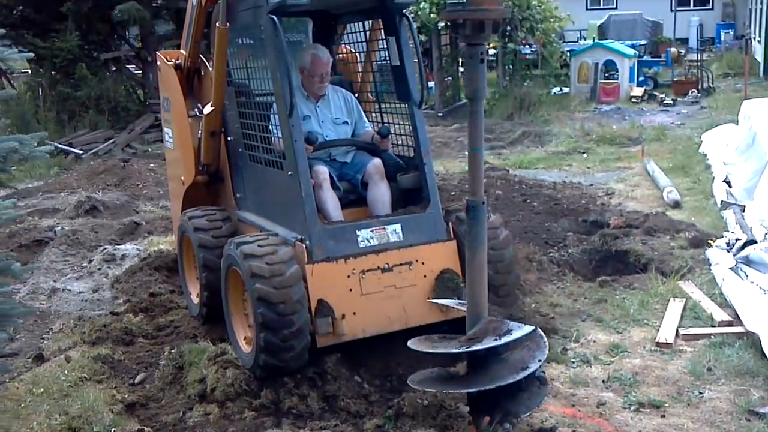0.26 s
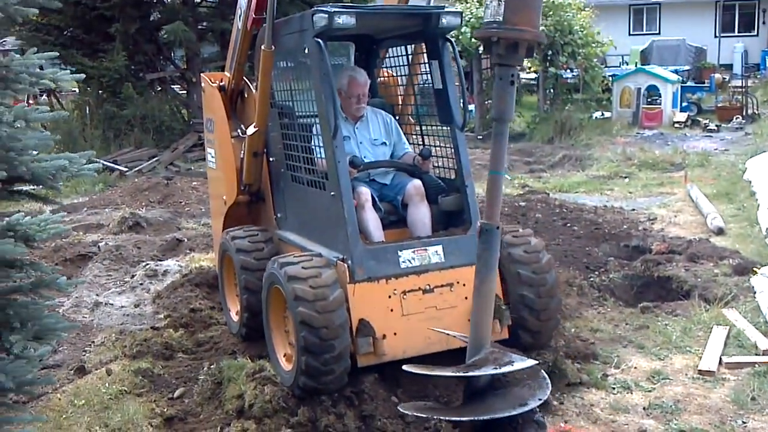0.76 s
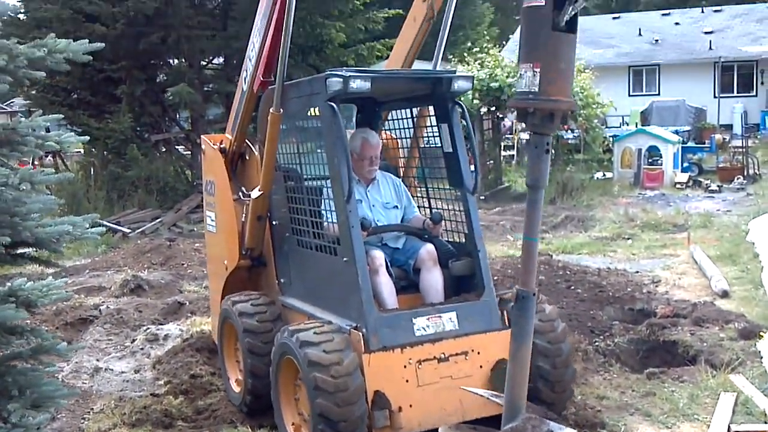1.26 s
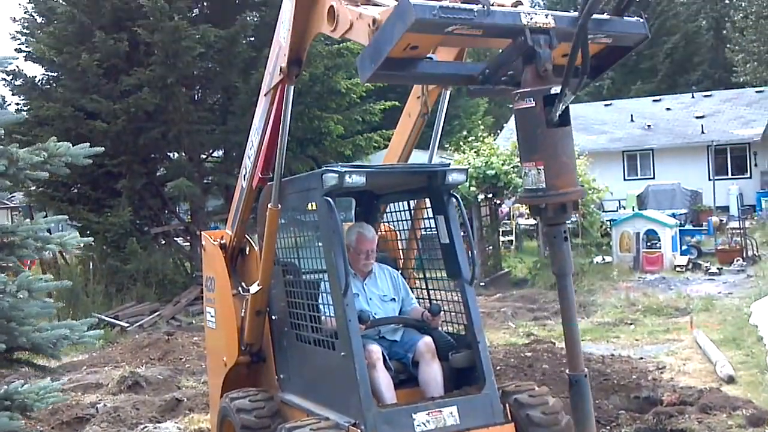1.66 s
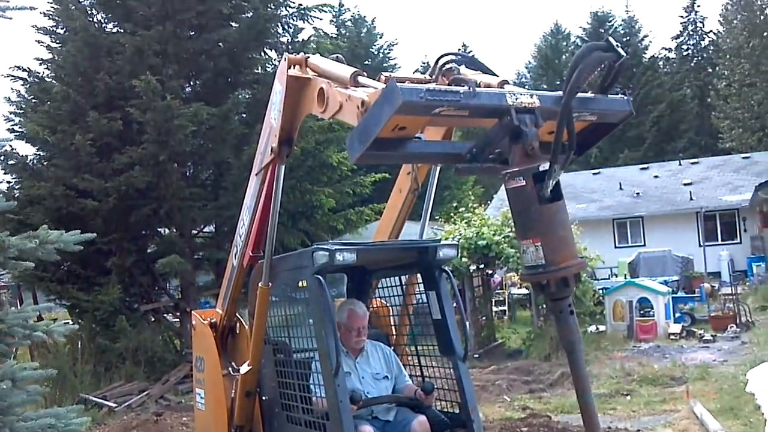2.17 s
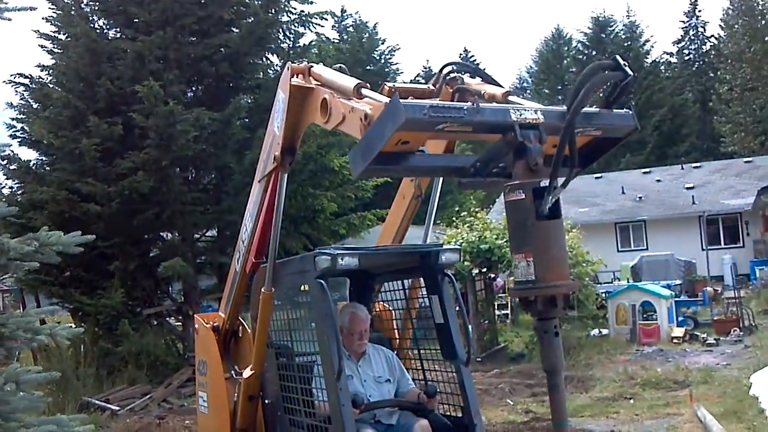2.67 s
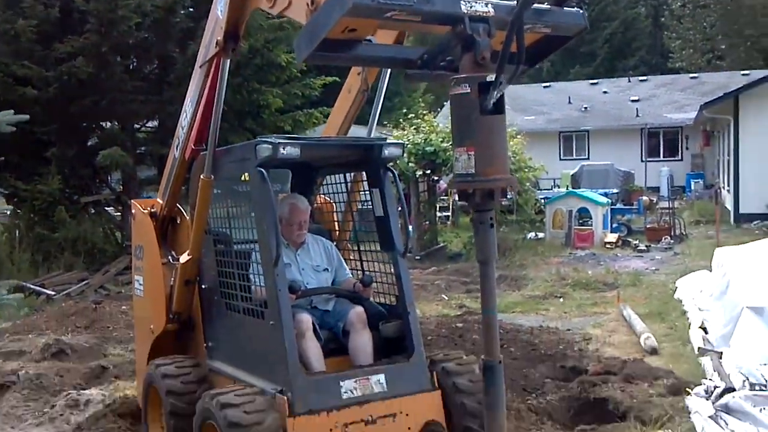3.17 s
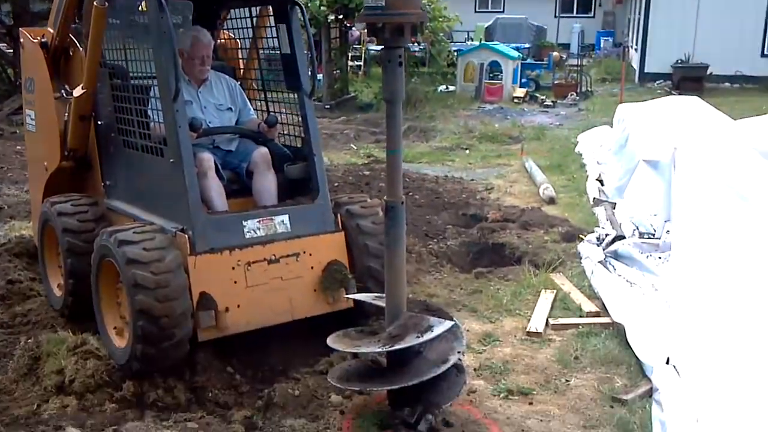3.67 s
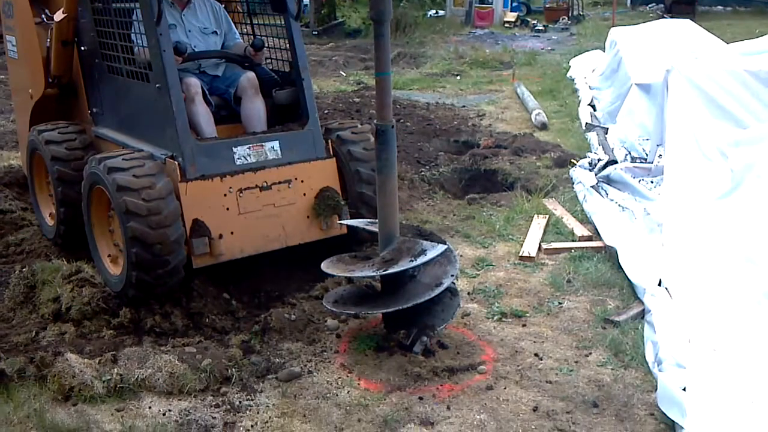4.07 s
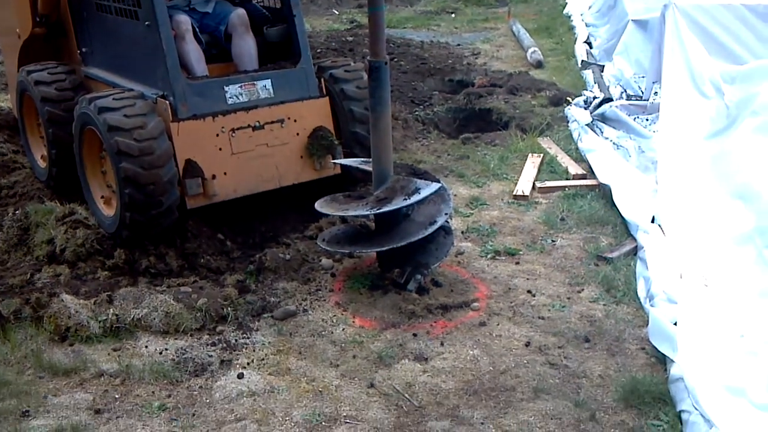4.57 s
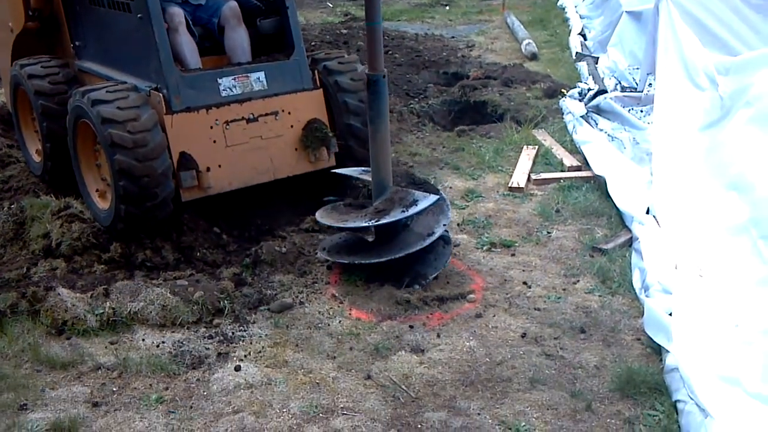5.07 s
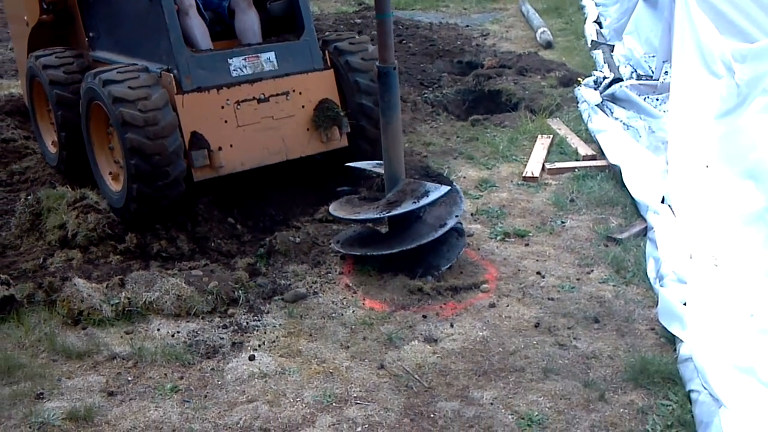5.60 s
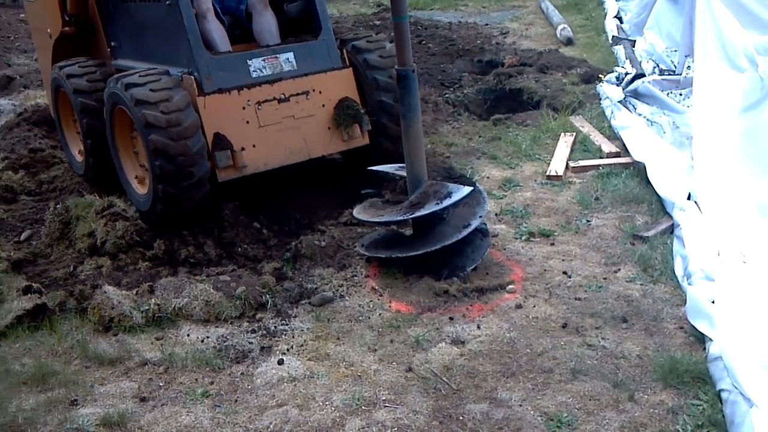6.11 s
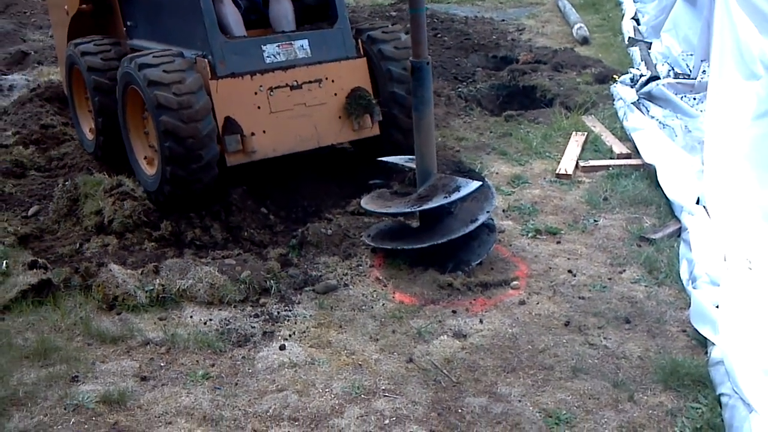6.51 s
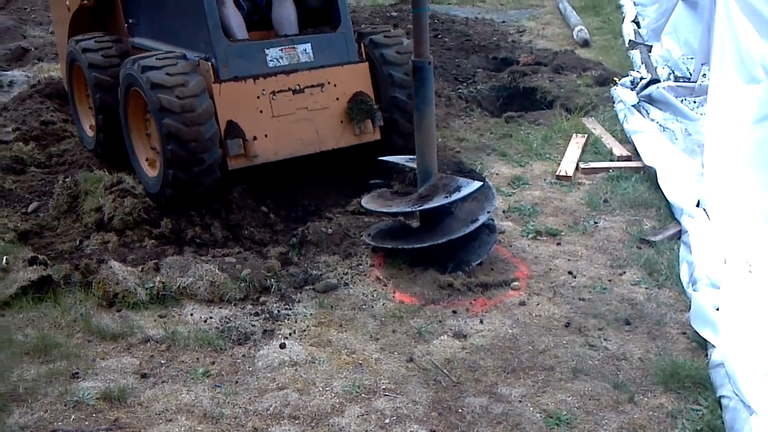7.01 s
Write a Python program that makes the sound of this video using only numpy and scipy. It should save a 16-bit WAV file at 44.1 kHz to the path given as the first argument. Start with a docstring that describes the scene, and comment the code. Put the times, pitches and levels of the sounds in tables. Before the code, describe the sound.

Steady diesel rattle with hydraulic whine and hiss, dry metallic groans, a bright steel-on-stone crack with scraping, then late buffeting wind on the microphone.

```python
"""A skid-steer loader in a backyard lifts its boom: the diesel clatters at a governed speed, the gear
pump whines, oil hisses and the dry boom pivots groan and clank. Then a post-hole auger is set
on stony soil; its bit cracks on a stone, scrapes and rings. Late gusts of filtered noise buffet the
two close ports of a hand-held phone. Its gain control creeps up, ducks at the crack and at the hardest
gust, and creeps up again. Tones are sines on a shared shaft; contacts are short noise bursts and modes."""
import sys
import numpy as np
from scipy import signal
from scipy.fft import rfft, irfft
from scipy.io import wavfile

SR = 44100
rng = np.random.default_rng(int(sys.argv[2]) if len(sys.argv) > 2 else 0)


def to_wav(s):
    """Save 16-bit WAV."""
    ch = np.atleast_2d(s).T  # columns
    pcm = np.round(np.clip(ch, -1, 1) * 32767)  # PCM
    wavfile.write(sys.argv[1], SR, pcm.astype(np.int16))


N = 319725  # samples, 7.25 s
T = np.arange(N) / SR  # time in s
FREQ = np.maximum(np.fft.rfftfreq(N, 1 / SR), 1)  # Hz
AGE = np.arange(SR // 2) / SR  # seconds since a short sound began
PUMP_TEETH = 10  # on the gear that the engine shaft turns


def undb(db):
    """Decibels to gain."""
    return 10 ** (np.asarray(db) / 20)


def unit(x):
    """Scale to rms 1."""
    return x / np.sqrt(np.mean(x ** 2))


def curve(table):
    """Straight lines between the (time_s, value) rows of a table, one value a sample."""
    time_s, value = np.transpose(table)
    return np.interp(T, time_s, value)


def colour(x, points):
    """Filter by a spectrum of (pitch_hz, level_db) points."""
    hz, db = np.transpose(points)
    return irfft(rfft(x) * undb(np.interp(np.log(FREQ), np.log(hz), db)), N)


def resonate(x, hz, width_hz):
    """A steep resonance, output rms 1."""
    count = x.shape[-1]
    f = np.maximum(np.fft.rfftfreq(count, 1 / SR), 1)
    detuning = (f - hz ** 2 / f) / width_hz
    return unit(irfft(rfft(x) / (1 + detuning ** 2), count))


def noise():
    """Two unrelated white noises."""
    return rng.standard_normal((2, N))


def grit():
    """A half-second stretch of two unrelated white noises."""
    return rng.standard_normal((2, len(AGE)))


def walk(count):
    """Smooth random wander of spread 1, with count new values a second."""
    values = rng.standard_normal(count * N // SR + 2)
    knots = signal.resample_poly(values, 8, 1)
    return np.interp(T, np.linspace(0, T[-1], len(knots)), unit(knots))


def place(pair, lean=0):
    """Direct and scattered sound to mid and side; lean is towards the left."""
    # how diffuse the machine's sound is: (pitch_hz, side_minus_mid_db)
    spread = [(60, -2), (150, -21), (420, -4.5), (560, 2), (750, -20), (1300, 2), (2400, 1), (15000, -0.5)]
    return np.array([pair[0], lean * pair[0] + colour(pair[1], spread)])


def tone(turns, lean, flutter_db, jitter):
    """One sine as mid and side, wavering in level and, by jitter in radians, in phase."""
    phase = 2 * np.pi * (turns + rng.random()) + jitter * walk(count=24)
    level = undb(flutter_db * walk(count=18))
    return np.sqrt(2) * np.sin(phase) * level * np.array([[1], [lean]])


def throb(turns, firing, shaft):
    """Loudness swells at each firing (two a turn) and once a turn."""
    return unit(np.exp(firing * np.cos(4 * np.pi * turns) + shaft * np.cos(2 * np.pi * turns)))


def puffs(cycles, rise, decay, scatter_db):
    """One sharp-fronted swell a cycle, each of its own strength; rise and decay are shares of the cycle."""
    phase, index = cycles % 1, cycles.astype(int)
    strength = undb(scatter_db * rng.standard_normal(N // 100))
    front = 1 - np.exp(-phase / rise)
    return unit(strength[index] * front * np.exp(-phase / decay))


def burst(rise, t60):
    """Envelope of a short sound: quick rise, then an exponential fall by 60 dB in t60 seconds."""
    return (1 - np.exp(-AGE / rise)) * np.exp(-np.log(1000) * AGE / t60)


def ringing(modes):
    """Struck steel: dying sine modes, as direct and scattered sound."""
    out = np.zeros((2, len(AGE)))
    for hz, db, t60 in modes:
        sine = np.sin(2 * np.pi * (hz * AGE + rng.random((2, 1))))
        out += undb(db) * burst(0.00035, t60) * sine
    return out


def add(track, s, sound):
    """Mix a short sound into a track at time s."""
    start = max(int(s * SR), 0)
    track[..., start:start + len(AGE)] += sound[..., :N - start]


def wind(mid_db=-14, side_db=2.5, overload_db=-13):
    """Eddies push on each port separately, so they sound mostly at the sides; the hardest overload the ports."""
    # strength of the breeze on the ports: (time_s, level_db)
    breeze = [(0, -53), (5.6, -48), (5.85, -38), (6.02, -42.5), (6.2, -27), (6.7, -31.5), (6.9, -19.5),
              (7.25, -38)]
    # the hardest gusts: (start_s, level_db)
    gusts = [(6.362, -16), (6.501, -10), (6.94, -5), (6.968, -8), (7.112, -12)]
    # colour of the wind noise: (pitch_hz, level_db)
    wind_colour = [(30, -32), (70, -41), (110, 9.5), (170, 4.5), (300, -3), (600, -19), (1500, -48),
                   (5000, -80)]
    push = undb(curve(breeze) + 0 * walk(count=20))  # the breeze follows its curve without extra flutter
    for s, db in gusts:
        add(push, s, undb(db) * burst(rise=0.002, t60=0.14))
    pressure = push * unit(colour(noise(), wind_colour))
    limit = undb(overload_db)
    return limit * np.tanh(pressure / limit) * undb([[mid_db], [side_db]])


def thud(start_s=6.965, level_db=-4.5, hz=257):
    """A couple of low cycles as the air slaps the phone at the peak of the hardest gust."""
    out = np.zeros((2, N))
    slap = burst(rise=0.0014, t60=0.027) * np.sin(2 * np.pi * hz * AGE)
    add(out, start_s, undb(level_db) * slap * np.array([[1], [.5]]))
    return out


def ticks(t60=0.0051):
    """Small stones tick dryly: a few dying cycles with a trace of grit."""
    # dry ticks: (start_s, level_db, pitch_hz)
    tick_table = [(0.248, 0.7, 3570), (1.343, 1.5, 3370)]
    out = np.zeros((2, N))
    for s, db, hz in tick_table:
        ping = np.sin(2 * np.pi * hz * AGE) * np.array([[1], [.3]])
        add(out, s, undb(db) * burst(0.00034, t60) * (ping + 0.21 * resonate(grit(), 4500, 9000)))
    return out


def oil(turns, hiss_db=-31):
    """Turbulent oil hisses in time with the engine and sings in the lift valve."""
    # colour of the hiss: (pitch_hz, level_db)
    oil_colour = [(90, -38), (550, -7), (800, -2), (1800, -4), (2250, -3), (3000, 2), (3700, 1.5),
                  (4400, -1), (5100, 0), (5700, -2), (6500, -4), (7800, -4.5), (9500, -9), (11200, -7.5),
                  (13500, -20), (16000, -12)]
    # oil rushing through the lift valve: (time_s, level_db)
    valve_level = [(0, -54), (1.7, -40), (3.05, -31.5), (3.8, -40.5), (5.2, -67), (7.25, -38)]
    # a thin, very high sizzle: (time_s, level_db)
    sizzle_level = [(0, -47), (3, -48), (5.25, -41), (5.5, -34.5), (6.0, -36), (6.08, -47), (7.25, -39)]
    rush = noise() * throb(turns, firing=0.049, shaft=0.016)
    hiss = unit(colour(rush, oil_colour)) * undb(0.73 * walk(count=24))
    sizzle = resonate(noise(), 11900, 9400)
    valve = resonate(noise(), 1506, 280.0) * throb(turns, firing=0.064, shaft=0.037)
    spray = place(undb(hiss_db) * hiss + undb(curve(sizzle_level)) * sizzle)
    return spray + undb(curve(valve_level)) * place(valve, lean=0.5)


def pump(turns):
    """Gear teeth pulse the oil: a whine, its octave and upper partials, and a drone from the lift circuit."""
    # level of the whine: (time_s, level_db)
    whine_level = [(0, -26), (.8, -23), (1.05, -26.5), (1.9, -22.5), (2.1, -26.5), (2.7, -25.5),
                   (2.9, -30.5), (3.3, -24.5), (4.7, -22.5), (5.2, -26.5), (5.5, -32.5), (6.03, -24),
                   (6.1, -34), (6.18, -25), (6.45, -29.5), (7.11, -25), (7.17, -39)]
    # the octave grows as the auger is lowered and loaded: (time_s, level_db)
    octave_level = [(0, -44), (3.2, -38), (3.45, -33), (5.0, -29.5), (5.25, -52), (5.6, -29.5), (6.2, -35),
                    (7.0, -33), (7.25, -40)]
    # pressure on the bit once it bores, which lifts the upper partials: (time_s, level_db)
    boring = [(0, -30), (5.3, -34), (5.6, 1.5), (6.0, 4.5), (6.2, -10), (7.25, 4)]
    # upper partials under load: (multiple of the tooth rate, level_db against the octave)
    upper_partials = [(3, -13), (4, -10.5)]
    # drone of the lift circuit while the boom rises: (time_s, level_db)
    lift_level = [(0, -34), (1.25, -38.5), (1.45, -33), (1.64, -25), (1.85, -31.5), (2.05, -33),
                  (2.28, -28), (2.5, -35.5), (3.2, -65), (7.25, -56)]
    # partials of the drone: (multiple of the shaft speed, level_db)
    lift_orders = [(14, -1), (21, -3.5), (26, -15), (28, -13), (30, -16), (42, -11.5), (44, -13.5)]
    teeth = PUMP_TEETH * turns
    octave_db = curve(octave_level)
    whine = undb(curve(whine_level)) * tone(teeth, lean=0.26, flutter_db=0.87, jitter=0.06)
    octave = undb(octave_db) * tone(2 * teeth, lean=0.3, flutter_db=0.5, jitter=0.054)
    drone = sum(undb(db) * tone(order * turns, lean=.2, flutter_db=.7, jitter=.1)
                for order, db in lift_orders)
    strain = sum(undb(db) * tone(k * teeth, lean=.1, flutter_db=-4.5, jitter=0.25)
                 for k, db in upper_partials)
    strain_db = octave_db + curve(boring)
    return whine + octave + undb(strain_db) * strain + undb(curve(lift_level)) * drone


def diesel(turns, repeat_db=-8.0, clatter_db=1.5, tones_db=-3.0, bark_db=-8.5, knock_db=-9):
    """Valve gear and injectors rattle alike in every turn, combustion differs each time."""
    # colour of the engine block: (pitch_hz, level_db)
    block = [(30, -48), (95, -25), (145, -1.5), (175, -1.5), (250, 2), (420, 3.5), (500, 0.5), (545, -7),
             (700, 2), (850, 1), (1020, -2), (1170, -6), (1500, -7), (1950, -2.5), (2600, -12), (5000, -44)]
    # engine tones: (multiple of the shaft speed, level_db against each other)
    shaft_orders = [(2, -22), (4, -12), (4.5, -12), (6, -10.5), (7.6, -10.5), (11, -14.5), (13, -16),
                    (14, -16), (15.3, -8.5), (19, -11), (21, -7), (24, -7.5), (26, -15), (29, -13.5),
                    (30, -6), (31, -8), (32, -6.5), (34, -14.5), (37, -18.5), (40, -17), (46, -13.5),
                    (50, -11.5), (58, -12.5)]
    # strength of combustion: (time_s, level_db)
    effort = [(0, 0), (1.5, -.5), (3.1, 0), (3.6, 1), (5.2, 1.5), (5.5, -0.5), (6.3, -3), (7.25, 1.5)]
    size = 1374  # points in the noise pattern of one turn
    pattern = irfft(np.exp(2j * np.pi * rng.random((2, size // 2 + 1))))
    grid = np.arange(size) / size
    repeating = unit(np.array([np.interp(turns % 1, grid, p) for p in pattern]))
    blows = (noise() + undb(repeat_db) * repeating) * throb(turns, firing=0.017, shaft=0.016)
    clatter = place(unit(colour(blows, block)), lean=0.5)
    # higher tones waver more
    tones = sum(undb(db) * tone(order * turns, lean=0.12, flutter_db=min(0.1 * order, 1), jitter=0.004 * order)
                for order, db in shaft_orders)
    # the exhaust barks once a turn and the tones chug with it, 0.3 turns late; every firing knocks
    chug = throb(turns - .3, firing=0, shaft=.35)
    bark = place(resonate(noise(), 770, 310), lean=0.05)
    bark = bark * puffs(turns, rise=0.095, decay=0.6, scatter_db=.5)
    knock = place(resonate(noise() + repeating, 1450, 1240), lean=0.32)
    knock = knock * puffs(2 * turns, rise=.03, decay=0.62, scatter_db=2.5)
    combustion = undb(tones_db) * tones * chug + undb(bark_db) * bark + undb(knock_db) * knock
    uneven = undb(0.92 * walk(count=24))  # no two working cycles burn alike
    return uneven * (undb(clatter_db) * clatter + undb(curve(effort)) * combustion)


def boom():
    """Dry pivots stick and slip in nearly pure groans that chatter, arch in pitch, waver and sag."""
    # groans and squeaks of the pivots: (middle_s, length_s, pitch_hz, level_db)
    groans = [(0.863, 0.15, 510, -27.5), (0.869, 0.096, 766, -29.5), (1.29, 0.59, 495, -32.5),
              (1.865, 0.096, 498, -22), (1.88, 0.14, 750, -26.5), (1.96, 0.15, 495.6, -17.5),
              (2.1, 0.15, 493.4, -27.5), (2.284, 0.2, 1357, -34), (2.6, 0.7, 501, -38),
              (2.82, 0.044, 500, -27), (2.95, 0.35, 1473, -31.5), (3.022, 0.094, 507, -28),
              (3.041, 0.014, 1235, -20.5), (3.125, 0.041, 509, -22)]
    # the fundamental and its harmonics in turn: level_db
    harmonics = [0, -14, -13.5]
    chatter_db = 1.3
    sag_per_s, arch, waver = .07, 0.0119, 0.0058  # shares of the pitch; the arch lowers both ends
    out = np.zeros(N)
    t = AGE - AGE[-1] / 2  # time from the middle of a groan
    for s, length, hz, db in groans:
        wobble, chatter = walk(count=40)[:len(t)], walk(count=50)[:len(t)]
        pressure = np.exp(-(2 * t / length) ** 2)
        swell = undb(db + chatter_db * chatter) * pressure * signal.windows.tukey(len(t), .5)
        pitch_hz = hz * (1 - sag_per_s * t - arch * (1 - pressure) + waver * wobble)
        cycles = np.cumsum(pitch_hz) / SR
        groan = sum(undb(h) * np.sin(2 * np.pi * (k + 1) * cycles) for k, h in enumerate(harmonics))
        add(out, s + t[0], swell * groan)
    return np.sqrt(2) * out * np.array([[1], [.2]])


def noise_bursts():
    """Scrapes and clanks are bursts of noise in a broad resonance; softer, low bursts lie around the whine."""
    # short soft low noise bursts around the pitch of the whine: (start_s, level_db)
    soft_bursts = [(1.32, -13), (2.598, -17), (3.279, -16), (4.006, -14.5)]
    # bright scrapes of steel and grit: (start_s, level_db, rise_s, t60_s)
    scrapes = [(.466, -21.5, 0.0023, 0.13), (1.87, -22, 0.048, 0.86), (3.034, -26, .001, 0.1),
               (3.116, -19.5, 0.001, 0.073), (5.249, -20, 0.0015, 0.09), (5.313, -24, .001, .05),
               (5.337, -28, .001, .06), (7.184, -13.5, 0.0022, 0.16)]
    # the rig clanks as the boom drops, and sprays grit as the bit bites:
    # (start_s, level_db, centre_hz, width_hz, t60_s)
    clanks = [(3.031, -27, 1000, 1800, .08), (3.115, -21.5, 1100, 2000, 0.21),
              (5.218, -16, 1300, 1500, 0.16), (5.235, -12, 945, 1500, 0.27), (5.314, -12, 1130, 750, 0.14),
              (7.116, -27, 7200, 4500, 1), (7.181, -16.5, 955, 1500, 0.35), (7.201, -13, 1150, 1100, 0.048),
              (7.211, -14, 1250, 1100, 0.085)]
    out = np.zeros((2, N))
    for s, db in soft_bursts:
        add(out, s, undb(db) * burst(rise=0.02, t60=0.14) * resonate(grit(), hz=318, width_hz=190))
    for s, db, rise, t60 in scrapes:
        add(out, s, undb(db) * burst(rise, t60) * resonate(grit(), hz=3000, width_hz=2400))
    for s, db, hz, width, t60 in clanks:
        add(out, s, undb(db) * burst(0.0051, t60) * resonate(grit(), hz, width))
    return place(out)


def auger(crack_t60=0.011, tail_db=-19, tail_t60=0.39):
    """Steel on stone: a bright crack of the teeth, a spray of grit and the ring of the flighting."""
    # the bit cracks on a stone, rebounds and is jolted again: (start_s, crack_db, ring_db)
    strikes = [(5.2139, -5, -12), (5.2188, -7.5, -8), (5.251, -29, 0), (5.316, -32, -10.5),
               (5.334, -33, -13), (7.199, -13, -7)]
    # colour of the crack: (pitch_hz, level_db)
    crack_colour = [(500, -47), (2200, 2.5), (3300, 2), (5000, -2), (6500, 0.5), (8300, -5), (11700, -16),
                    (13200, -23), (16000, -32)]
    # bright, short-lived modes of the cutting teeth: (pitch_hz, level_db, t60_s)
    tooth_modes = [(3530, -9, 0.044), (6476, -8.5, 0.037), (6840, -9.5, 0.029), (11500, -21.5, 0.073)]
    # what the auger rings with: (pitch_hz, level_db, t60_s)
    auger_modes = [(767, -17, 0.21), (958, -16.5, 0.18), (1357, -29, 0.2), (3230, -16, 0.07),
                   (3660, -16.5, 0.19)]
    contact, ring = np.zeros(N), np.zeros((2, N))
    for s, crack_db, ring_db in strikes:
        spray = undb(tail_db) * burst(0.00083, tail_t60)
        add(contact, s, undb(crack_db) * (burst(0.00014, crack_t60) + spray))
        add(ring, s, undb(crack_db) * ringing(tooth_modes) + undb(ring_db) * ringing(auger_modes))
    return place(ring + contact * unit(colour(noise(), crack_colour)))


def scene():
    """One shaft drives engine and pump; all sources add up as mid and side, then become left and right."""
    # the governed speed sags under lifting and boring: (time_s, pump_tooth_rate_hz)
    speed = [(0, 320.8), (1.35, 321.9), (1.6, 319), (2.0, 318.6), (2.2, 321.9), (2.9, 320.8), (3.3, 322),
             (3.9, 321.3), (5.25, 321.3), (5.65, 315.7), (6.1, 316), (6.35, 322.8), (7.1, 321), (7.25, 313)]
    turns = np.cumsum(curve(speed) / PUMP_TEETH) / SR
    machine = undb(-31) * diesel(turns) + pump(turns) + oil(turns)
    mid, side = machine + boom() + noise_bursts() + ticks() + auger() + wind() + thud()
    return np.array([mid + side, mid - side])


def lag(x, seconds):
    """One-pole smoothing that starts settled."""
    keep = np.exp(-1 / (seconds * SR))
    return x[0] + signal.lfilter([1 - keep], [1, -keep], x - x[0])


def gain_control(x, start_gain_db=-12.5, ceiling_db=-19, recovery_db_per_s=3.5):
    """The gain ducks quickly when the sound passes the ceiling, then creeps back up towards unity."""
    level_db = 10 * np.log10(lag(np.mean(x ** 2, axis=0), seconds=0.0053))
    allowed_db = np.minimum(ceiling_db - level_db, 0)
    allowed_db[0] = start_gain_db
    creep_db = recovery_db_per_s * T
    # the lowest gain allowed so far, each one rising at the recovery rate
    gain_db = creep_db + np.minimum.accumulate(allowed_db - creep_db)
    return x * undb(lag(gain_db, seconds=0.011))


def record(dry, low_cut_hz=58, top_hz=15700, port_notch_hz=2612, peak_limit=.85):
    """The phone widens its two close ports by a delayed cross-feed, rides the gain and cuts both ends."""
    # the cross-feed combs mid and side in turn
    angle = np.pi * FREQ / port_notch_hz
    mid_gain = np.where(angle < np.pi / 2, 1, np.sin(angle))  # the bass of the mid is equalised flat
    mid = irfft(rfft(dry[0] + dry[1]) / 2 * mid_gain, N)
    side = irfft(rfft(dry[0] - dry[1]) / 2 * np.cos(angle), N)
    ridden = gain_control(np.array([mid + side, mid - side]))
    # only the loudest peaks are rounded off
    rounded = ridden / np.sqrt(np.hypot(1, (ridden / peak_limit) ** 2))
    high_pass = signal.butter(3, low_cut_hz, "high", fs=SR, output="sos")
    low_pass = signal.ellip(10, .2, 70, top_hz, fs=SR, output="sos")
    return signal.sosfilt(np.vstack([high_pass, low_pass]), rounded)


dry = scene()
out = record(dry)
to_wav(out)
```